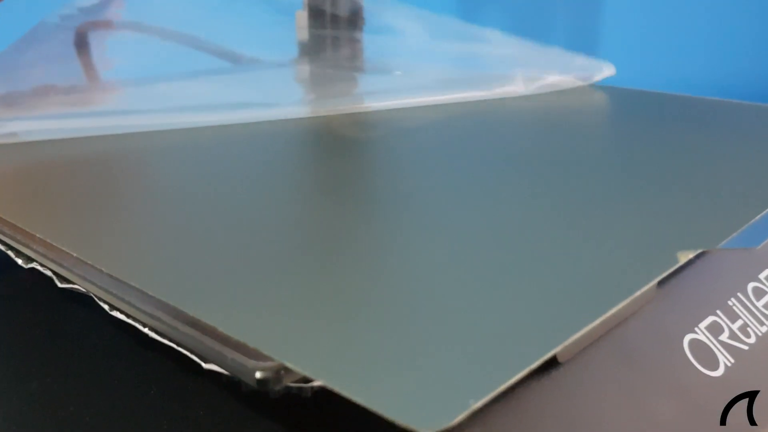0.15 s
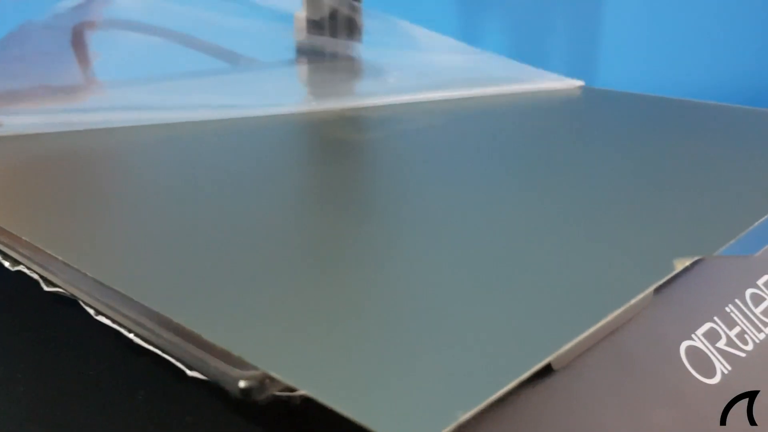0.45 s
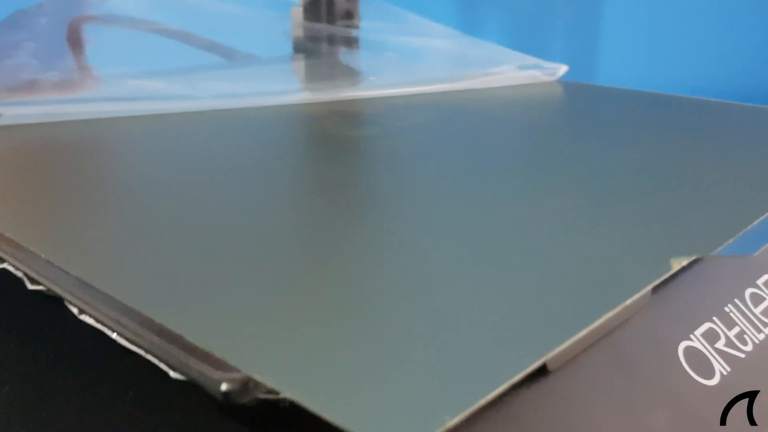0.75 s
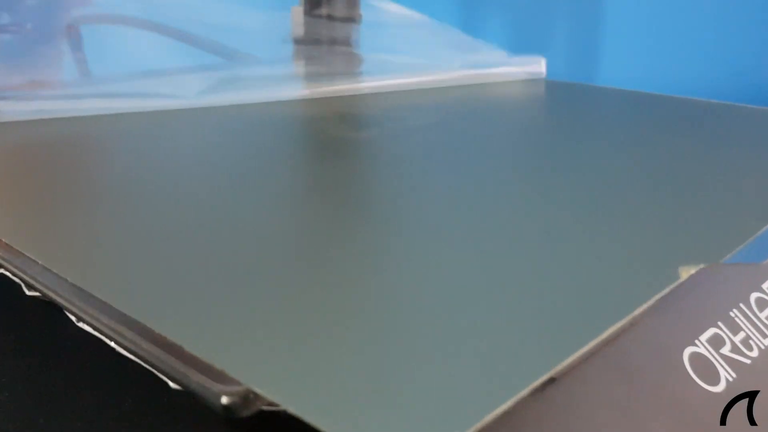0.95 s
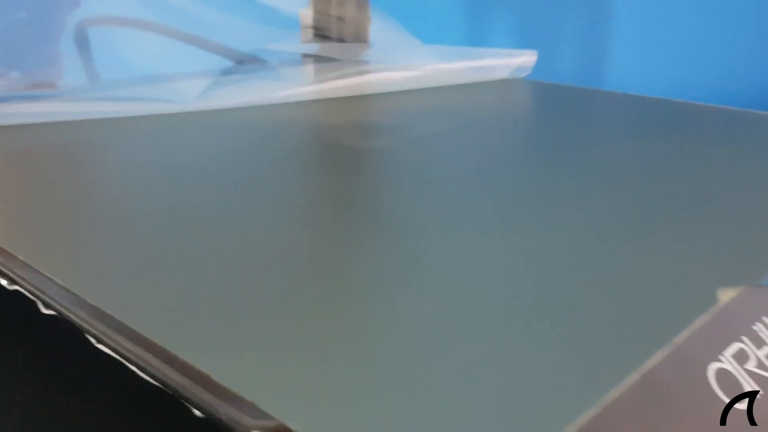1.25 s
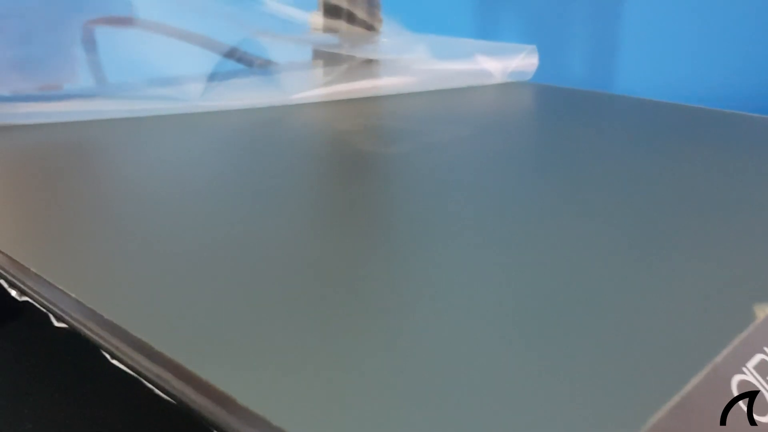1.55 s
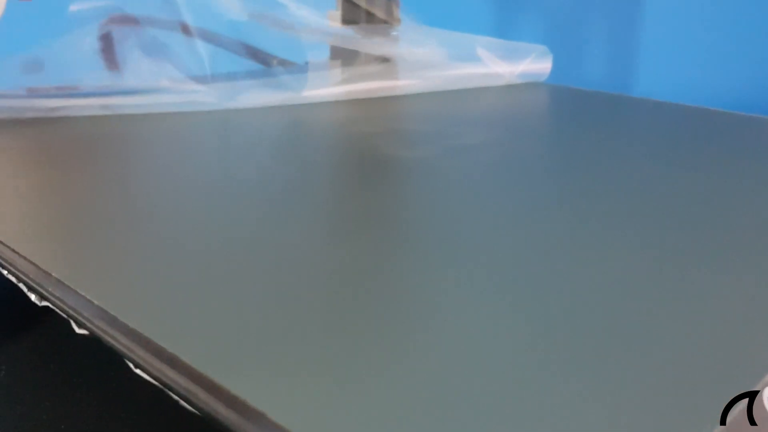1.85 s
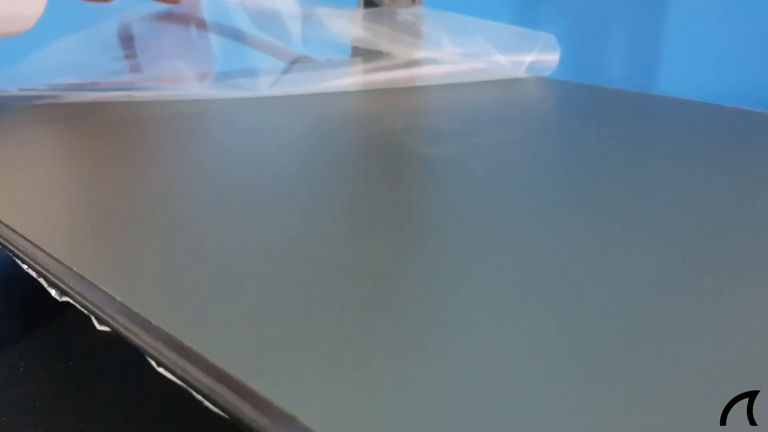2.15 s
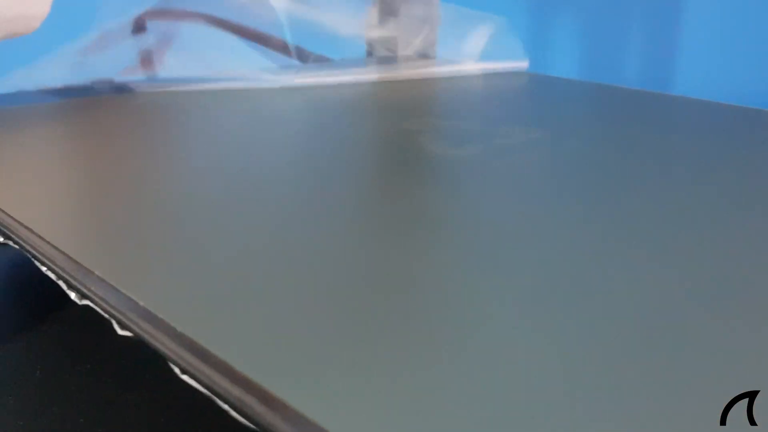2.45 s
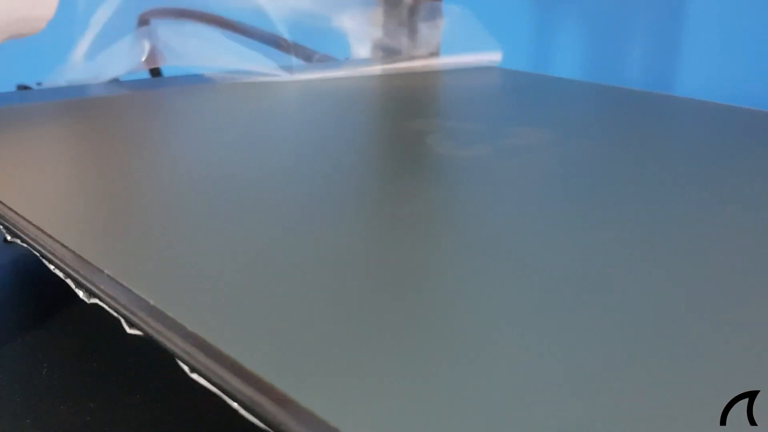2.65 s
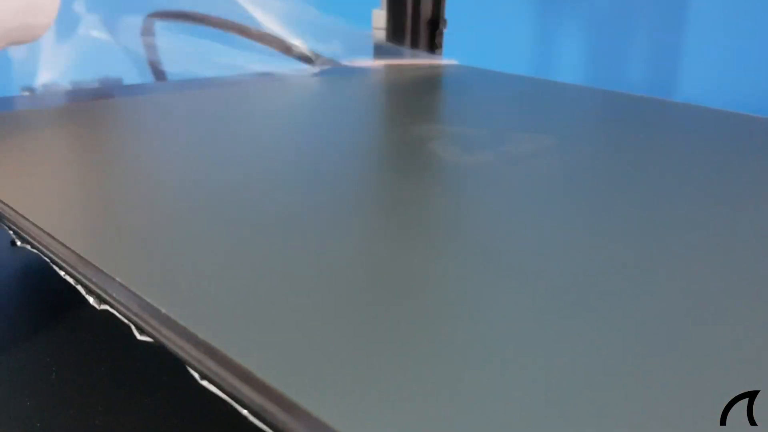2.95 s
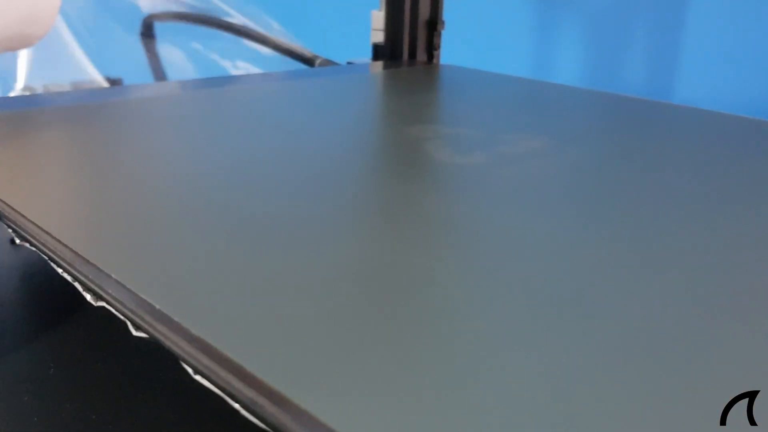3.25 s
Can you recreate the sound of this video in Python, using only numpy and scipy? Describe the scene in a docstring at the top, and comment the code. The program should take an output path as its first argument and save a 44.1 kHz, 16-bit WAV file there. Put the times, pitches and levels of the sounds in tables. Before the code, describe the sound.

Plastic film peels from a metal sheet, close and dry in a small room with faint low rumble. From 0 to 1.1 s, bright sticky crackle comes in quiet uneven tugs with light snaps; it thins around 1.2-1.7 s. Near 1.9 s it surges into dense hiss and lower rustle, with sharp crease pops from 2.2 to 2.8 s, a soft thud at 3.0, then easing before a loud rip at 3.33 s.

```python
"""Peeling film off metal

Thin plastic film is peeled off a metal sheet indoors, close to a pair of microphones.
The glue lets go in thousands of tiny slips a second: filtered clicks that follow uneven tugs.
Creases tick and snap as short damped tones, and the freed film rustles lower, as sparser clicks.
The sheet gives a few soft thuds, a last corner rips free, and quiet room noise lies below."""
import sys
import numpy as np
from scipy import signal
from scipy.fft import rfft, irfft, next_fast_len
from scipy.io import wavfile
from scipy.ndimage import uniform_filter1d, map_coordinates

SR = 44100
rng = np.random.default_rng(int(sys.argv[2]) if len(sys.argv) > 2 else 0)


def natural_amplitude(level_db):
    """Convert a level in decibels to a linear amplitude factor, elementwise."""
    exponent = np.asarray(level_db, float) / 20
    return 10 ** exponent


def pcm_store(signal):
    """Save signal as 16-bit PCM."""
    levels = np.round(np.clip(np.atleast_2d(signal), -1, 1) * 32767)
    wavfile.write(sys.argv[1], SR, levels.astype(np.int16).T)


N = 149940  # length in samples

# The pull, in uneven tugs that set the strength of the slips: time_s, level_db
TUGS = [(0.0, -43), (0.12, -43), (0.271, -38), (0.487, -44.5), (0.509, -40), (0.555, -31.5), (0.585, -40.5),
        (0.659, -45.5), (0.692, -49), (0.728, -38), (0.786, -43), (0.83, -35), (0.872, -44), (0.884, -36.5),
        (0.924, -37), (1.02, -46.5), (1.052, -42), (1.105, -40), (1.2, -45.5), (1.277, -56.5), (1.383, -55),
        (1.407, -40.5), (1.477, -54), (1.588, -59.5), (1.708, -46.5), (1.782, -43.5), (1.802, -44.5),
        (1.835, -37.5), (1.87, -30), (1.888, -36), (1.958, -46.5), (1.991, -32.5), (2.111, -36.5),
        (2.205, -39.5), (2.227, -33.5), (2.303, -35.5), (2.359, -29.5), (2.409, -30.5), (2.444, -35),
        (2.486, -28.5), (2.522, -33.5), (2.608, -29), (2.746, -32), (2.778, -28.5), (2.937, -34.5),
        (2.989, -28), (3.093, -38.5), (3.133, -34.5), (3.183, -40), (3.193, -29.5), (3.247, -42.5),
        (3.299, -47), (3.312, -40), (3.324, -45), (3.344, -25), (3.398, -38)]
# State of the film, both levels relative to the slips: time_s, rustle_db, fizz_db
FILM_STATE = [(0, -25, 1.5), (.3, -20, 0.5), (.8, -23.5, 0.5), (1.07, -11, 0), (1.2, -7.5, -6.5),
              (1.45, -4.5, -1), (1.7, -12, -2.5), (1.87, -1.5, -6), (1.97, -5, -1), (2.45, -3, -0.5),
              (2.85, -4.5, -0.5), (3.15, -1.5, -4.5), (3.4, -12, 0)]
# Single snaps of creases: start_s, level_db, pitch_hz
CREASE_SNAPS = [(0.219, -18.5, 2240), (0.31, -18.5, 2300), (0.516, -31, 2600), (0.545, -20, 2180),
                (0.883, -19, 4000), (1.05, -19.5, 2450), (1.404, -23, 2380), (1.81, -24, 2780),
                (1.938, -16.5, 1420), (1.978, -16.5, 1940), (1.989, -32, 4280), (2.176, -13.5, 1850),
                (2.225, -9.5, 2400), (2.418, -12.5, 3770), (2.432, -15, 2280), (2.505, -15, 2070),
                (2.538, -10, 4000), (2.604, -8, 5700), (2.733, -10.5, 2780), (2.985, -10, 2230),
                (3.192, -15, 1150), (3.312, -39, 1950)]
# Short bursts of ticks where a crease gives way: start_s, level_db (of the strongest ticks)
TICK_BURSTS = [(.048, -30.5), (0.082, -36), (.135, -40.5), (0.152, -34.5), (.196, -32.5), (.261, -33.5),
               (.531, -38), (.73, -36.5), (.796, -37), (0.821, -33.5), (.841, -34), (.908, -29),
               (.926, -31.5), (1.082, -34), (1.185, -34), (1.747, -39.5), (1.766, -33.5), (1.839, -24),
               (1.859, -22.5), (2.332, -24), (2.451, -24.5), (2.481, -24.5), (2.585, -22.5), (2.702, -21.5)]
# Soft thuds of the sheet: start_s, level_db, pitch_hz
SHEET_THUDS = [(.009, -49, 110), (0.546, -43.5, 214), (1.005, -48, 79.5), (1.861, -49, 363),
               (2.987, -30.5, 338)]
# Tone colour of the glue slips, through the microphone: pitch_hz, level_db
SLIP_COLOUR = [(600, -38.5), (1150, -26), (1700, -16.5), (2350, -6), (3400, -6), (5300, -3), (6900, -6),
               (7900, -18), (10000, -31)]
# Tone colour of the finest fizz of the glue: pitch_hz, level_db
FIZZ_COLOUR = [(6500, -54), (8000, -7.5), (10500, 0.5), (12400, 6.5), (15700, 0)]
# Tone colour of the rustling loose film: pitch_hz, level_db
RUSTLE_COLOUR = [(40, -31), (80, -16.5), (160, -17), (320, -6), (650, -9), (1000, 0), (1500, 0),
                 (2300, 2.5), (3300, -14.5), (5000, -58.5)]
# Tone colour of the last corner ripping free: pitch_hz, level_db
RIP_COLOUR = [(700, -52), (2000, 8.5), (3000, -1), (4500, 6.5), (7500, -21.5)]
# Small creases send out little bass: pitch_hz, gain_db
CREASE_COLOUR = [(500, -24), (1500, 0)]
# Tone colour of the sheet's dull after-sound: pitch_hz, level_db
SHEET_COLOUR = [(120, -11.5), (300, 1), (900, -17)]
# Tone colour of the room rumble: pitch_hz, level_db
RUMBLE_COLOUR = [(25, 32.5), (75, 38), (280, 31.5), (800, 24.5), (1500, 5.5)]
# How alike left and right sound, 1 being the same: pitch_hz, likeness
LIKENESS = [(60, 1), (300, 0.94), (900, 0.68), (1500, 0.22), (2500, 0.0088), (6000, 0.031)]
# How much louder left is than right: pitch_hz, difference_db
LEFT_OVER_RIGHT = [(350, 3), (700, 0.5), (2300, -6.5), (4000, -1.5), (6000, -1), (9000, -7.5),
                   (15000, -5.5)]
# How long the room takes to fade by 60 dB: pitch_hz, fade_s
ROOM_FADE = [(200, 0.56), (2000, 0.096), (12000, 0.025)]

SLIPS_PER_S, RUSTLES_PER_S, TICKS_PER_S = 12000, 2000, 500
RIP_START_S, RIP_RISE_S, RIP_FADE_S, RIP_DB = 3.332, 0.0081, 0.16, -11.5
BURST_S, TICK_DB = 0.013, -8  # longest delay in a burst; base level of scattered ticks over the slips
RUMBLE_DB, TOP_HZ = -68, 15750


def unit(x):
    """Scales a sound to an average strength (rms) of 1."""
    return x / np.sqrt(np.mean(x ** 2) + 1e-20)


def along(points, hz):
    """Reads a curve at any pitch, joining its points on a log pitch axis."""
    f, v = np.transpose(points)
    return np.interp(np.log(hz + 1), np.log(f + 1), v)


def wobble(rate):
    """A smooth random curve with this many random points a second."""
    knots = rng.standard_normal(int(N * rate / SR) + 4)
    return map_coordinates(knots, [np.arange(N) * rate / SR])


def fading(fade_s, size, start_db=0):
    """A level that falls by 60 dB in fade_s."""
    return natural_amplitude(start_db - 60 * np.arange(size) / SR / fade_s)


def coloured(x, points):
    """Filters a sound to a tone colour; the filter answers only after each click, never before."""
    m = next_fast_len(N + 8192)
    gain = natural_amplitude(along(points, np.fft.rfftfreq(m, 1 / SR)))
    # Folding the cepstrum forward in time gives a minimum-phase filter
    c = irfft(np.log(gain + 1e-6), m)
    c = np.concatenate([c[:1], 2 * c[1:m // 2], np.zeros(m - m // 2)])
    return irfft(rfft(x, m) * np.exp(rfft(c)), m)[..., :N]


def impulses(rate, spread_db):
    """Two trains of random clicks of either sign; a few clicks are larger than the rest."""
    count = int(rate * N / SR)
    excess = np.minimum(rng.exponential(size=(2, count)), 5)
    size = natural_amplitude(spread_db * excess) * rng.choice([-1, 1], (2, count))
    return np.array([np.bincount(rng.integers(0, N, count), row, N) for row in size])


def kicks_at(s, db):
    """One click at each given time."""
    return np.bincount(np.round(s * SR).astype(int), natural_amplitude(db), N)[:N]


def rings(s, gain, hz, turns, size):
    """One short damped tone per event, dying in a few cycles."""
    cycles = np.arange(size) / SR * hz[:, None]
    shape = np.sin(2 * np.pi * cycles) * np.exp(-cycles / turns) * (1 - np.exp(-cycles / 0.23))
    shape = shape / np.abs(shape).max(axis=1, keepdims=True)
    at = np.round(s * SR).astype(int)[:, None] + np.arange(size)
    return np.bincount(at.ravel(), (gain[:, None] * shape).ravel(), N + size)[:N]


def patchy(x, depth_db):
    """The colour shifts with the film's shape: random gain in patches of time and frequency."""
    z = signal.stft(x, nperseg=256)[2]
    field = rng.standard_normal(z.shape[1:])
    field = uniform_filter1d(field, size=6, axis=0)
    field = uniform_filter1d(field, size=12, axis=1)
    return unit(signal.istft(z * natural_amplitude(depth_db * unit(field)), nperseg=256)[1][:, :N])


def controls():
    """Levels in dB at every sample: slips, rustle and fizz, all driven by the pull."""
    t = np.arange(N) / SR
    pull_db = np.interp(t, *np.transpose(TUGS))
    s, rustle_db, fizz_db = np.transpose(FILM_STATE)
    return pull_db, pull_db + np.interp(t, s, rustle_db), pull_db + np.interp(t, s, fizz_db)


def rumble():
    """Quiet room noise that slowly wavers, partly shared by both microphones."""
    a, b = unit(coloured(rng.standard_normal((2, N)), RUMBLE_COLOUR))
    return natural_amplitude(RUMBLE_DB + 2.7 * wobble(5.96)) * np.array([a + 0.98 * b, a - 0.88 * b])


def room(x):
    """Echoes blur into a noise-like tail in which each frequency dies at its own speed."""
    hz, t, z = signal.stft(rng.standard_normal((2, SR // 3)), SR, nperseg=256)
    fade = natural_amplitude(-60 * t / along(ROOM_FADE, hz)[:, None])
    tail = signal.istft(z * fade, SR, nperseg=256)[1]
    return signal.fftconvolve(x[None], tail / np.linalg.norm(tail[0]), axes=1)[:, :N]


def reflected(x, near_s):
    """Near reflections smear the sound and change as the peel line creeps along."""
    knots = np.linspace(0, N, 30)
    smears = rng.standard_normal((len(knots), 256)) * fading(near_s, 256)
    total = np.zeros(N)
    for knot, smear in zip(knots, smears):
        # Neighbouring smears crossfade at equal power
        fade = np.sqrt(np.clip(1 - np.abs(np.arange(N) - knot) / knots[1], 0, 1))
        total += signal.oaconvolve(fade * x, smear / np.linalg.norm(smear))[:N]
    return total


def microphones(shared, other):
    """Two microphones share the bass but hear different treble, mostly louder on the right."""
    m = next_fast_len(N + 8192)
    hz = np.fft.rfftfreq(m, 1 / SR)
    turn = np.arccos(np.clip(along(LIKENESS, hz), 0, 1)) / 2
    mid = rfft(shared, m) * np.cos(turn)
    side = rfft(other, m) * np.sin(turn)
    lean = natural_amplitude(along(LEFT_OVER_RIGHT, hz) / 2)
    return irfft(np.array([(mid + side) * lean, (mid - side) / lean]), m)[:, :N]


def thuds():
    """The sheet flexes and settles: a damped tone with a dull, noisy after-sound."""
    s, db, hz = np.transpose(SHEET_THUDS)
    tail = signal.fftconvolve(kicks_at(s, db), fading(0.19, 8000, start_db=-4))[:N]
    after_sound = tail * unit(coloured(rng.standard_normal(N), SHEET_COLOUR))
    return rings(s, natural_amplitude(db) / 2, hz, turns=2.3, size=8000) + after_sound


def ticks():
    """Small creases tick, scattered with the pull and in short bursts; slacker film ticks lower."""
    pull_db, loose_db, _ = controls()
    when, luck = rng.random((2, int(TICKS_PER_S * N / SR)))
    at = (when * N).astype(int)
    # The logarithm makes a few ticks stand out
    db = (pull_db + TICK_DB + 1.5 * wobble(24.77))[at] - 0.97 * np.log(luck + 0.09)

    start, burst_db = np.transpose(TICK_BURSTS)[..., None]
    late, less = rng.random((2, len(TICK_BURSTS), 12))  # 12 ticks a burst, crowded near its start
    s = np.append(at / SR, start + BURST_S * late ** 2)
    db = np.append(db, burst_db - 8 * less)

    slack_db = (loose_db - pull_db)[(s * SR).astype(int)]
    hz = 1950 * np.exp(0.11 * rng.standard_normal(len(s)) - 0.01 * slack_db)
    return rings(s, natural_amplitude(db) * rng.choice([-1, 1], len(s)), hz, turns=3.5, size=256)


def snaps():
    """A crease pops: a few cycles at its pitch and a sharp crack with a short fizz."""
    s, db, hz = np.transpose(CREASE_SNAPS)
    ring = rings(s, natural_amplitude(db - 4), hz, turns=1.4, size=400)
    kicks = kicks_at(s, db)
    crack = natural_amplitude(-11.5) * coloured(kicks, SLIP_COLOUR)
    tail = signal.fftconvolve(kicks, fading(0.016, 2000, start_db=-9))[:N]
    noise = rng.standard_normal(N)
    hiss = unit(coloured(noise, SLIP_COLOUR)) + natural_amplitude(-18) * unit(coloured(noise, FIZZ_COLOUR))
    return ring + crack + tail * hiss


def rip():
    """The last corner rips free: a dense burst of coarse slips that swells and dies."""
    since = np.clip(np.arange(N) / SR - RIP_START_S, 0, None)
    swell = (1 - np.exp(-since / RIP_RISE_S)) ** 2 * natural_amplitude(RIP_DB - 60 * since / RIP_FADE_S)
    return swell * unit(coloured(impulses(RUSTLES_PER_S * 2, spread_db=3), RIP_COLOUR))


def peel():
    """Glue slips and fizzes, loose film rustles; two draws, from different stretches of peel line."""
    pull_db, loose_db, fizz_db = controls()
    judder = wobble(60)
    release = impulses(SLIPS_PER_S, spread_db=3)  # the same clicks drive slips and fizz
    slips = patchy(coloured(release, SLIP_COLOUR), depth_db=2) * natural_amplitude(pull_db + 0.5)
    fizz = patchy(coloured(release, FIZZ_COLOUR), depth_db=0.2) * natural_amplitude(fizz_db - 1.5)
    brushing = impulses(RUSTLES_PER_S, spread_db=0.5)
    rustle = patchy(coloured(brushing, RUSTLE_COLOUR), depth_db=2)
    return (slips + fizz) * natural_amplitude(0.82 * judder) + rustle * natural_amplitude(loose_db + 1.2 * judder)


def scene():
    """Film and creases, heard directly and through the room, with the thuds and rumble added."""
    pops = coloured(ticks() + snaps(), CREASE_COLOUR)
    shared, other = peel() + rip()
    wet = natural_amplitude(-13.5) * room(shared + pops)
    other_pops = reflected(pops, near_s=0.0035)
    film = microphones(shared + pops + wet[0], other + other_pops + wet[1])
    return film + thuds() + rumble()


def roll_off(x):
    """The treble ends steeply here."""
    return signal.sosfilt(signal.butter(12, 15760, fs=SR, output="sos"), x)


def record(dry):
    """Removes everything from TOP_HZ upward and passes the finished mix on."""
    spectrum = rfft(dry, axis=1) * (np.fft.rfftfreq(N, 1 / SR) < TOP_HZ)
    mix = irfft(spectrum, N, axis=1)
    return roll_off(mix)


dry = scene()
out = record(dry)
pcm_store(out)
```